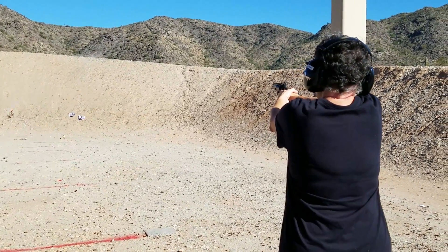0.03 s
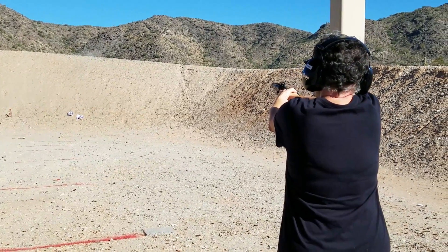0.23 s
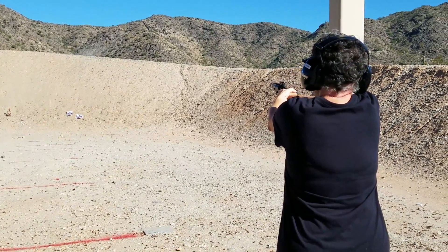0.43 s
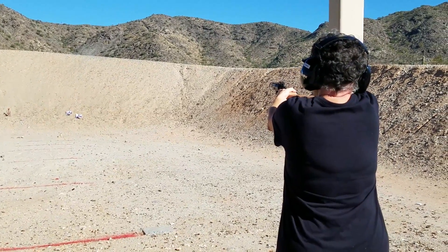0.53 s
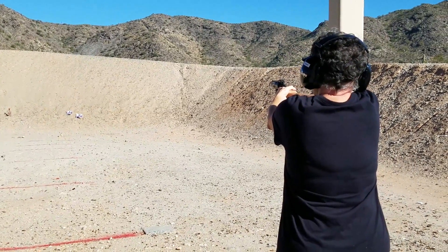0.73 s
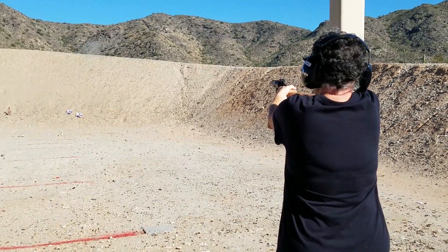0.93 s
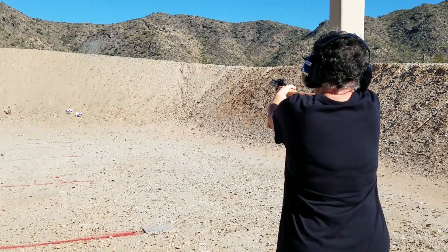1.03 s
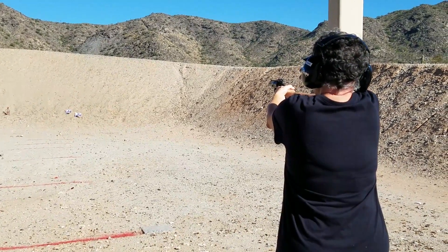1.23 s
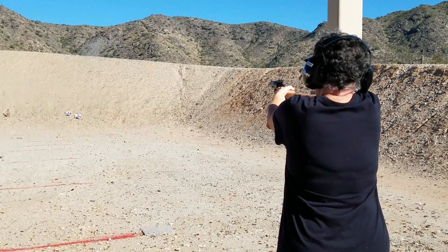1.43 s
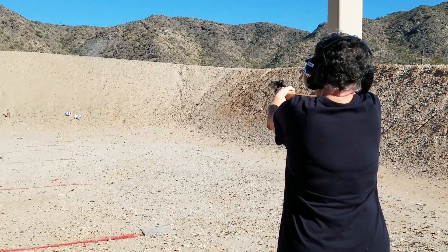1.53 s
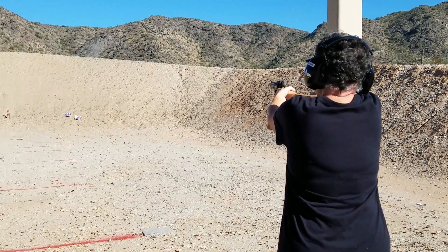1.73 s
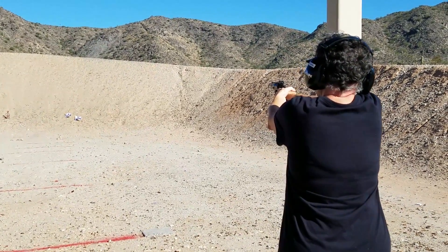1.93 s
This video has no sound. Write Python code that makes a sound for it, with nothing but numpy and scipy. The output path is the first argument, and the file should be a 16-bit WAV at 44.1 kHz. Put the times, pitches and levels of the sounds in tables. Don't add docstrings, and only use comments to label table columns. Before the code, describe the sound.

A handgun fires once after a brief faint hum, its blast a muffled, tightly packed burst with mid-pitched body. Separate echoes scatter off earth banks and hills, then a weaker distant shot cracks; open-air stereo microphone.

```python
import sys
import numpy as np
from scipy import signal
from scipy.io import wavfile

SR = 44100
rng = np.random.default_rng(int(sys.argv[2]) if len(sys.argv) > 2 else 0)


def volts_from_db(level):
    exponent = np.asarray(level, float) / 20
    return 10 ** exponent


def unload_audio(sound):
    columns = np.transpose(np.atleast_2d(sound))
    steps = np.round(np.clip(columns, -1, 1) * 32767)
    wavfile.write(sys.argv[1], SR, steps.astype(np.int16))


N = 88200

# t/s, air level/dB, hum level/dB
AMBIENCE = [
    (0, -65, -62.5),
    (.2, -63.5, -60.5),
    (.9, -64, -65.5),
    (1.15, -64.5, -64.5),
    (1.5, -64.5, -66.5),
    (2.0, -64.5, -69.5),
]
# f/Hz, level/dB
AIR_COLOUR = [(30, -12), (100, -4), (250, -10), (450, -7.5), (620, -1.5), (850, -12), (2000, -15.5),
              (6000, -31)]
# f/Hz, level/dB
HISS_COLOUR = [(30, -9), (3000, -8), (7000, -13), (10000, -13.5), (13000, -6.5), (16000, 7)]
# f/Hz, likeness/1 (-1 to 1)
LIKENESS = [(60, 0.21), (130, 1), (290, 0.71), (640, 0.6), (1200, -0.23), (3100, 0.089), (7000, -0.19)]

# t/s, peak level/dB, pulse length/ms, left lag/ms
FAR_PULSES = [
    (1.1990, -17.5, .6, -.22),
    (1.2001, -22, .6, -.3),
    (1.2020, -33, .9, -.35),
    (1.2042, -33, .9, -.2),
]
# f/Hz, level/dB, swell/ms
FAR_RINGS = [(3600, -37, .7), (5400, -42, 1.1), (9200, -50, 1.2)]
# f/Hz, level/dB
FAR_COLOUR = [(50, -19), (300, -8), (950, 3), (2000, 4), (4200, -2.5), (6000, -20), (9300, -19.5),
              (10500, -59)]

# t/s, level/dB, f/Hz, length/s
FLURRIES = [
    (.222, -46, 10000, .026),
    (.350, -65, 9000, .035),
    (.595, -62, 3250, .025),
    (.59, -70, 4600, .03),
    (.716, -72, 5400, .012),
    (.690, -64, 1900, .03),
    (1.1985, -57, 3600, .035),
    (.44, -66, 4600, .06),
    (.268, -56, 9000, .025),
    (.885, -62, 400, .06),
]
# t/s, level/dB, tilt above the body/(dB per octave)
SCATTER = [
    (.221, -53, -5),
    (.228, -26.5, 0),
    (.258, -26.5, -3),
    (.280, -28, -1),
    (.315, -30, -3.5),
    (.37, -32.5, -2),
    (.41, -44, -2),
    (.74, -55, -6),
    (.85, -63, -4.5),
]
# f/Hz, level/dB
SCATTER_COLOUR = [(50, -23.5), (380, -14), (640, -8), (1000, -6), (1450, -14.5), (2050, -17), (4000, -22),
                  (15000, -40)]
# f/Hz, width/Hz, gain/dB
SCATTER_RINGS = [(701, 82, 1), (516, 130, -7), (973, 28, -0.5), (2050, 500, 3)]
# t/s, left lag/ms
SCATTER_LAG = [
    (.40, -.42),
    (.47, .3),
    (.9, .3),
    (1.0, -.25),
]
# f/Hz, likeness/1
SCATTER_LIKENESS = [(60, .9), (640, .75), (2000, 0.22), (7000, .4)]

# t/s, peak level/dB, f/Hz, swell/ms
THUMPS = [
    (0.2253, -25.5, 153, 3.3),
    (0.234, -35.5, 94.8, 2.9),
    (0.281, -41, 91, 3.3),
    (0.306, -32, 222, 3.6),
    (0.449, -42, 154, 2.3),
    (0.712, -47, 103, 1.57),
    (0.921, -63, 164, 9.3),
    (.955, -57, 275, 5.3),
    (1.31, -67, 150, 12),
    (1.199, -50, 132.4, 1.65),
]
# t/s, peak level/dB, f/Hz, t60/ms, left lag/ms
GLINTS = [(.2745, -26, 1880, 40, -0.38), (.2805, -28.5, 2270, 25, -.43), (1.2005, -40, 950, 95, -0.31),
          (1.2005, -51, 1710, 60, -0.21), (.4487, -35, 1920, 46, 0.37), (0.4489, -38, 2860, 14, 0.22),
          (0.5054, -49.5, 3220, 53, .2), (.5166, -43.5, 1900, 23, -0.0056), (.5445, -63, 1880, 13, 0.21),
          (.5679, -61, 1890, 34, -0.076), (0.5897, -49, 3210, 54, 0.096), (.6632, -48, 2050, 25, 0.059),
          (0.6646, -49, 3370, 15, 0.091), (.6857, -39, 1810, 50, 0.016), (.6872, -52, 3450, 15, 0.2),
          (.7126, -49, 1780, 16, -0.37), (0.714, -41, 2600, 11, -0.26), (0.7135, -50, 3830, 14, -0.284),
          (0.7126, -55, 5500, 14, -0.36), (.747, -55, 1960, 50, -0.16), (0.748, -52, 3170, 20, -0.069),
          (.8314, -49.5, 1820, 19, 0.53), (0.8308, -53, 2500, 10, 0.32), (0.8316, -54.5, 3310, 14, 0.35),
          (.8922, -66, 2040, 20, 0.43)]
# t/s, peak level/dB, body f/Hz, upper part level/dB, left lag/ms
ECHOES = [(.428, -39, 550, -13, 0.077), (.4480, -25, 770, -9.5, 0.34), (.4535, -31, 556, -2.5, 0.47),
          (.470, -37.5, 700, -27, 0.2), (.495, -45, 710, -11, 0.02), (.515, -48, 630, -10, -0.56),
          (.5440, -35, 640, -29, 0.33), (.590, -43, 950, -21, 0.092), (.618, -40.5, 375, -27, 0.06),
          (.638, -40, 427, -33, 0.19), (.663, -51, 685, -5, 0.075), (.6865, -35, 795, 0.5, 0.35),
          (.6905, -39.5, 626, -20, 0.058), (.713, -38.5, 607, -3.5, 0.37), (.720, -39.5, 664, -6, .3),
          (.729, -45, 575, -9, 0.19), (.7475, -41, 690, -12, -0.15), (.8310, -38.5, 635, -11, 0.39),
          (.8350, -47, 650, -13, 0.14), (.889, -48, 524, -7, 0.24), (.950, -50, 617, -12, 0.31),
          (1.115, -51.5, 890, -1, 0.25), (1.259, -49, 610, -15.5, -0.15), (1.277, -57, 630, -28, -0.38),
          (1.301, -49, 630, -25, -0.13), (1.328, -51, 640, -24.5, -0.15), (1.767, -52.5, 670, -13, 0.24),
          (1.812, -51, 630, -20, 0.12)]
# t/s, peak level/dB, body f/Hz, upper part level/dB, left lag/ms
FRONTS = [(.2214, -23, 630, -16, -.2), (.2241, -11, 680, -13, -.42), (.2256, -12, 670, -14, -.35),
          (.2270, -10, 700, -11, -.25), (.2299, -14, 660, -8, -.15), (.2328, -22, 640, 0, -.3),
          (.2346, -16, 550, -6, -.1), (.2364, -9, 570, -9, 0.05), (.2390, -20, 800, 5, .2),
          (.2409, -12, 660, -11, -.2), (.2468, -17, 700, -10, -.3), (.2515, -20, 800, -6, -.3),
          (.2570, -21, 600, -9, -.3), (.2695, -19, 650, -8, -.43), (.2745, -21, 720, -1, -.43),
          (.2805, -23, 620, -1, -.45), (.2858, -17, 690, -12, -.1), (.2900, -19, 700, -8, 0),
          (.2950, -23, 700, -8, -.3), (.3135, -18, 705, -14, -.23), (.333, -27, 700, -12, -.23),
          (.347, -27, 690, -10, -.1), (.358, -27, 700, -10, -.2), (.384, -29, 700, -12, -.25)]
# f/Hz, level/dB, ring/ms
UPPER = [(1073, -1, 0.99), (1935, -3.5, 1.3), (2245, -11.5, 0.67), (3500, -20, 1.3), (4480, -21.5, 0.37),
         (6360, -15.5, 0.16), (8200, -41, 0.34), (11700, -17.5, 0.26)]

TIME_S = np.arange(N) / SR
BLAST_S = FRONTS[0][0]
HALF_APART = np.array([[.5], [-.5]])


def rms_one(x):
    return x / np.sqrt(np.mean(x ** 2) + 1e-20)


def in_time(rows):
    s, *columns = np.transpose(rows)
    return [np.interp(TIME_S, s, c) for c in columns]


def at_hz(points, hz):
    table_hz, values = np.transpose(points)
    return np.interp(np.log(hz), np.log(table_hz), values)


def drift(rate):
    r = np.exp(-80 * np.pi * rate / SR)
    noise = rng.standard_normal(N // 40 + 2002)
    slow = signal.lfilter([1], [1, -2 * r, r * r], noise)[2000:]
    return np.interp(np.arange(N) / 40, np.arange(len(slow)), rms_one(slow))


def bandpass(x, low, high):
    return signal.sosfilt(signal.butter(2, [low, high], "band", fs=SR, output="sos"), x)


def bands(spectrum, patchy_db, rate, shape, likeness=LIKENESS):
    out, power = 0, 0
    edges = 25 * 2 ** np.arange(0, 9.5, 1 / 3)
    white = rng.standard_normal((2, 2, N))
    together = drift(rate)
    for k, (low, high) in enumerate(zip(edges, edges[1:])):
        mid, side = bandpass(white[k % 2], low, high)
        hz = np.sqrt(low * high)
        alike = np.clip(at_hz(likeness, hz), -.99, .99)
        level = volts_from_db(at_hz(spectrum, hz))
        power += level ** 2 * (high - low) * 2 / SR
        flicker_db = patchy_db * (0.37 * together + 1.13 * drift(rate))
        gain = level * volts_from_db(flicker_db) * shape(hz)
        out = out + gain * (np.sqrt(1 + alike) * mid + np.sqrt(1 - alike) * side * [[1], [-1]])
    return out / np.sqrt(2 * power)


def ages(s, lag_ms):
    i = int(s * SR) - 50
    t = (i + np.arange(2646)) / SR - s - HALF_APART * lag_ms / 1000
    return slice(i, i + 2646), np.maximum(t, 0)


def swell(t, tau):
    return t / tau * np.exp(1 - t / tau)


def sine(hz, t):
    return np.sin(2 * np.pi * hz * t)


def ambience():
    air_db, hum_db = in_time(AMBIENCE)
    phase = 2 * np.pi * 630.5 * TIME_S + .3 * drift(2)
    hum_gain = volts_from_db(hum_db + 1.0 * drift(2.5))
    hum_pan = volts_from_db(HALF_APART * 1.5)
    hum = np.sqrt(2) * np.sin(phase) * hum_gain * hum_pan
    air = bands(AIR_COLOUR, 0.71, 13, lambda hz: volts_from_db(air_db))
    hiss = volts_from_db(-75) * bands(HISS_COLOUR, 0.6, 5.9, lambda hz: 1)
    return hum + air + hiss


def far_shot():
    pulses = np.zeros((2, N))
    for s, db, ms, lag in FAR_PULSES:
        where, t = ages(s, lag)
        u = t * 1000 / ms
        pulses[:, where] += volts_from_db(db) * np.sin(2 * np.pi * u ** .8) * np.exp(-2 * u) * (u < 1)
    out = signal.sosfilt(signal.butter(4, 5500, fs=SR, output="sos"), pulses + 1e-18)

    start_s, _, _, lag = FAR_PULSES[0]
    where, t = ages(start_s, lag)
    for hz, db, ms in FAR_RINGS:
        out[:, where] += volts_from_db(db) * swell(t, ms / 1000) * sine(hz, t)

    age = TIME_S - start_s
    early_db, early_t60_s = -45, 0.19
    late_db, late_t60_s = -56, 0.9

    def tail_gain(hz):
        fall = -60 * np.maximum(age, 0) * (max(hz, 1000) / 1000) ** 0.25
        early = volts_from_db(early_db + fall / early_t60_s)
        late = volts_from_db(late_db + fall / late_t60_s)
        return (age > 0) * (early + late)

    return out + bands(FAR_COLOUR, 1.57, 52, tail_gain)


def flurries():
    out = np.zeros((2, N))
    t = np.arange(4410) / SR
    for s, db, hz, length in FLURRIES:
        width = 1.45 if hz in (3600, 4600) or hz > 6000 else 1.1
        noise = rng.standard_normal((3, len(t)))
        mid, *sides = bandpass(noise, hz / width, hz * width)
        i = int(s * SR)
        out[:, i:i + len(t)] += volts_from_db(db) * rms_one(mid + .8 * np.array(sides)) * swell(t, length / 3)
    return out


def scatter():
    db, tilt = in_time(SCATTER)
    age = np.clip(TIME_S - SCATTER[0][0], 0, 1)
    late = np.maximum(TIME_S - SCATTER[-1][0], 0)

    def tail_gain(hz):
        fade_db = db - 30 * late
        tilt_db = tilt * max(np.log2(hz / 640), 0)
        bass_db = (hz < 450) * 7.5 * age
        return (age > 0) * volts_from_db(fade_db + tilt_db + bass_db)

    return bands(SCATTER_COLOUR, 1.72, 21.0, tail_gain, SCATTER_LIKENESS)


def resonant(x):
    out = x.copy()
    for hz, width_hz, db in SCATTER_RINGS:
        out += volts_from_db(db) * signal.lfilter(*signal.iirpeak(hz, hz / width_hz, SR), x + 1e-18)
    return out


def lagged(x):
    lag, = in_time(SCATTER_LAG)
    n = np.arange(N)
    shift = lag * SR / 2000
    return np.array([np.interp(n - side * shift, n, c) for side, c in zip((1, -1), x)])


def thumps():
    out = np.zeros((2, N))
    for s, db, hz, ms in THUMPS:
        where, t = ages(s, 0)
        out[:, where] += volts_from_db(db) * swell(t, ms / 1000) * sine(hz, t)
    return out * volts_from_db(HALF_APART * -2.5)


def glints():
    out = np.zeros((2, N))
    rise_ms = .5
    for s, db, hz, ms, lag in GLINTS:
        where, t = ages(s, lag)
        pair = sine(hz, t) + volts_from_db(-5) * sine(hz * 1.14, t)
        rise = 1 - np.exp(-1000 * t / rise_ms)
        out[:, where] += volts_from_db(db - 60000 * t / ms) * rise * pair
    return out


def fronts(rows):
    out = np.zeros((2, N))
    chance = rng.standard_normal((len(rows), 3, 2, len(UPPER)))
    for (s, db, hz, upper_db, lag), (side_luck, level_luck, pitch_luck) in zip(rows, chance):
        where, t = ages(s, lag)
        wave = swell(t, 1.25 / hz) ** 2 * sine(hz, t)
        for k, (up_hz, up_db, ms) in enumerate(UPPER):
            loss_db = 3.5 * (s - BLAST_S) * up_hz / 1000
            spread_db = 1.5 * side_luck[:, k:k + 1] + 4 * level_luck[0, k]
            gain = volts_from_db(upper_db + up_db - loss_db + spread_db)
            ring_hz = up_hz * (1 + .022 * pitch_luck[0, k])
            wave = wave + gain * swell(t, ms / 1000) * sine(ring_hz, t)
        out[:, where] += volts_from_db(db) * wave
    return out


def scene():
    tail = lagged(resonant(scatter()))
    bed = ambience() + far_shot() + flurries() + tail
    return bed + thumps() + glints() + fronts(ECHOES) + fronts(FRONTS)


def roll_off(x):
    return signal.sosfilt(signal.butter(12, 16310, fs=SR, output="sos"), x)


def record(dry):
    ceiling, low_cut_hz, top_cut_hz = .8, 50, 16400
    x = ceiling * np.tanh(dry / ceiling)
    x = signal.sosfilt(signal.butter(2, low_cut_hz, "high", fs=SR, output="sos"), x)
    x = signal.sosfilt(signal.cheby2(16, 60, top_cut_hz, fs=SR, output="sos"), x)
    return roll_off(x - .0005)


dry = scene()
out = record(dry)
unload_audio(out)
```